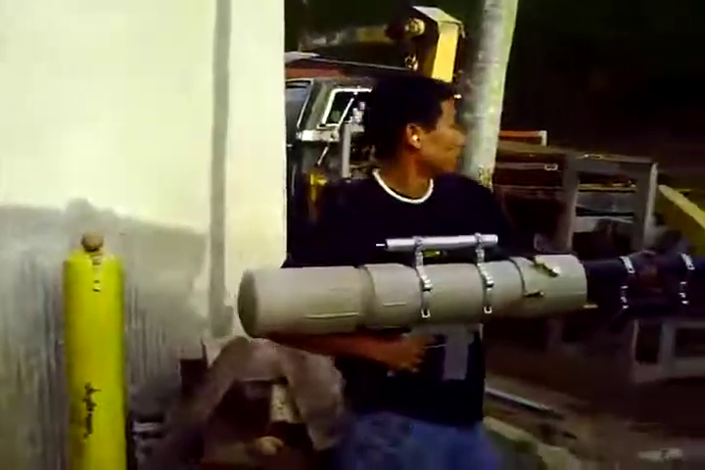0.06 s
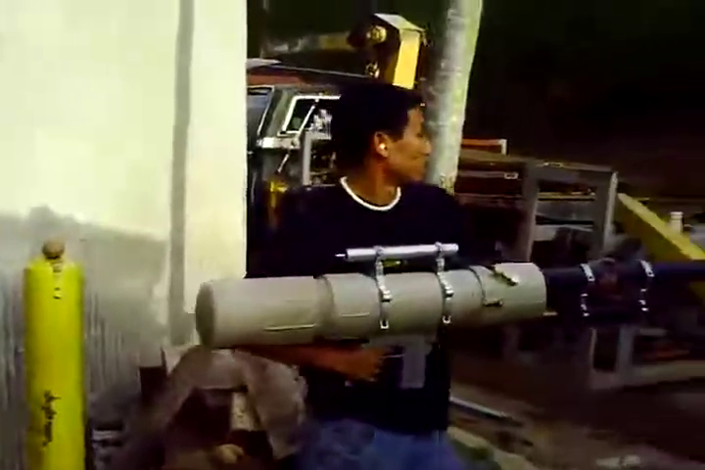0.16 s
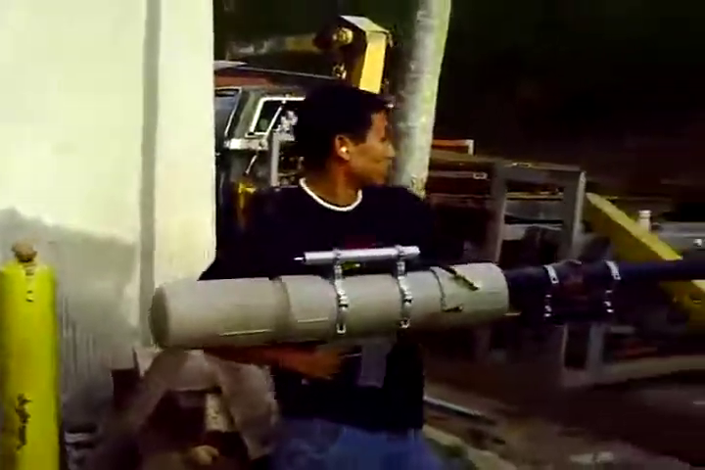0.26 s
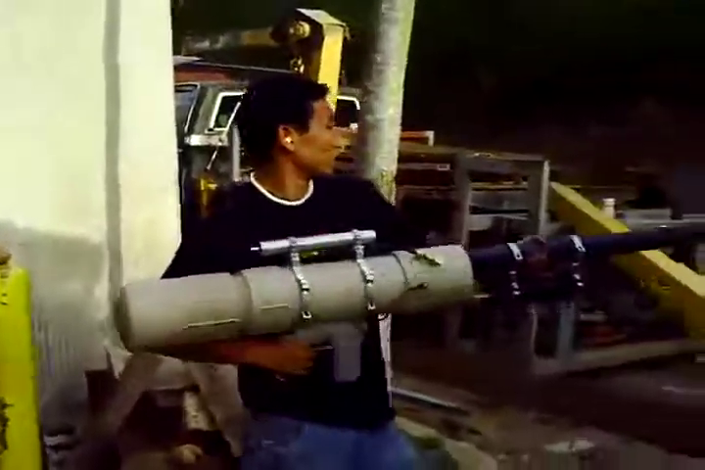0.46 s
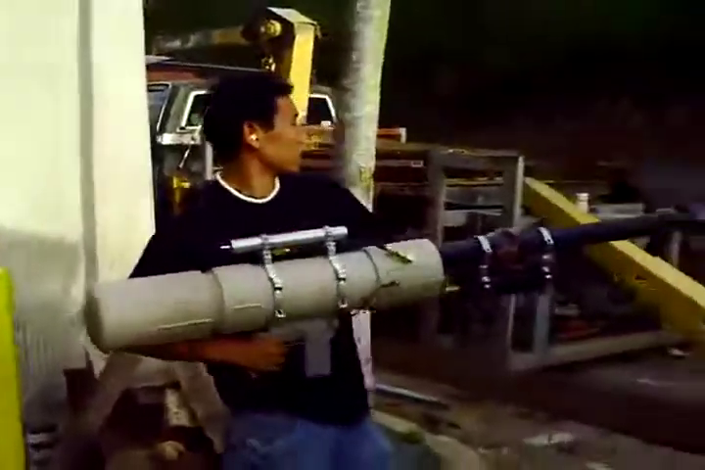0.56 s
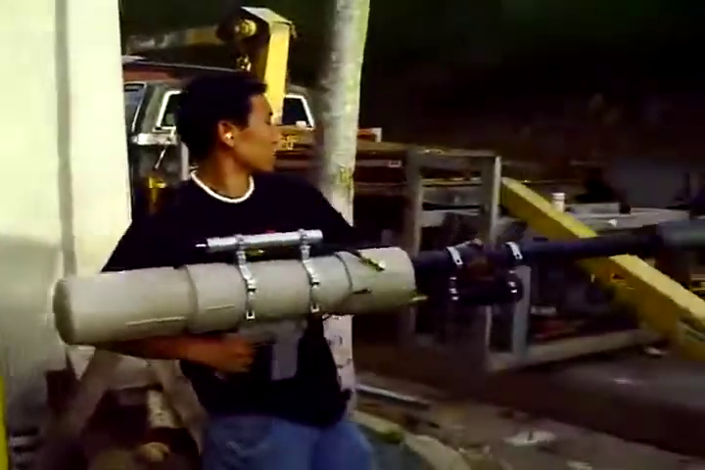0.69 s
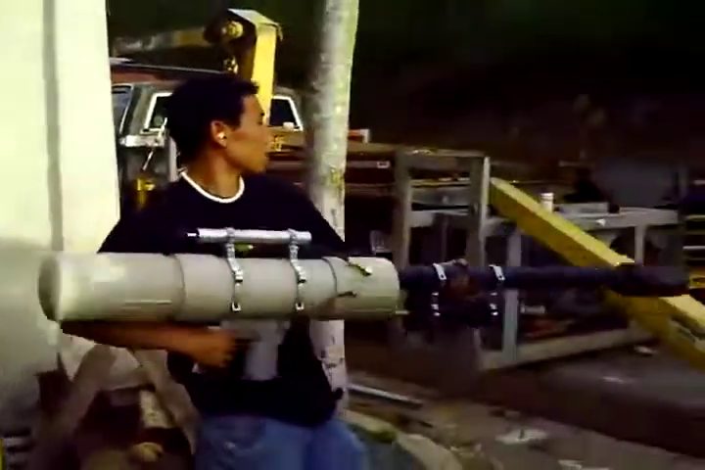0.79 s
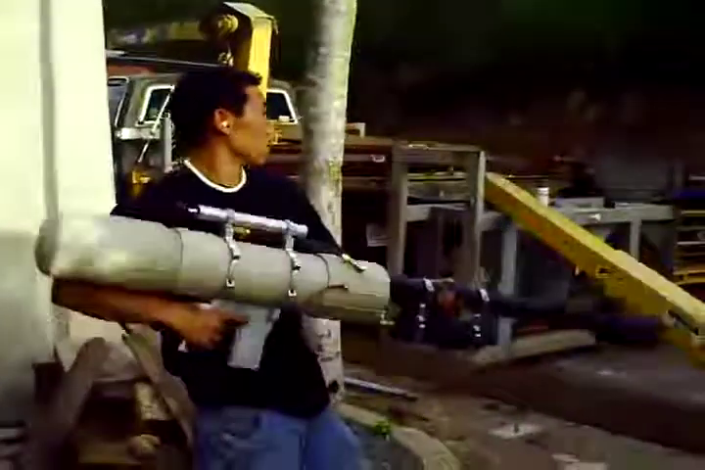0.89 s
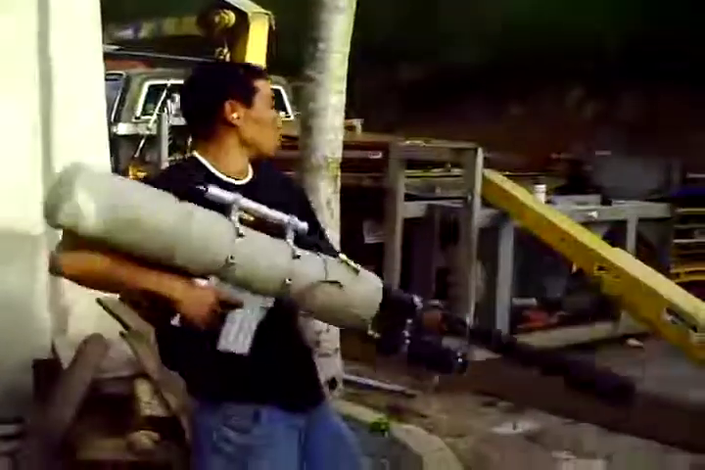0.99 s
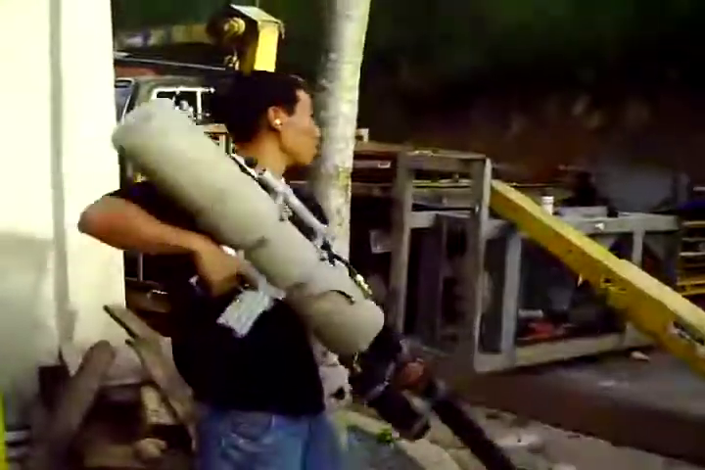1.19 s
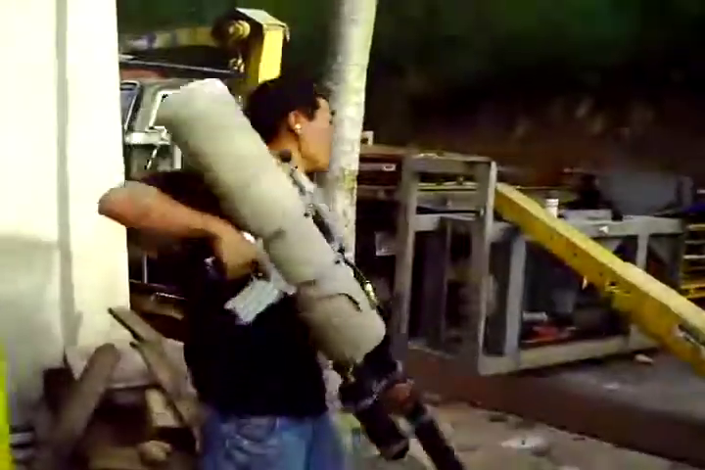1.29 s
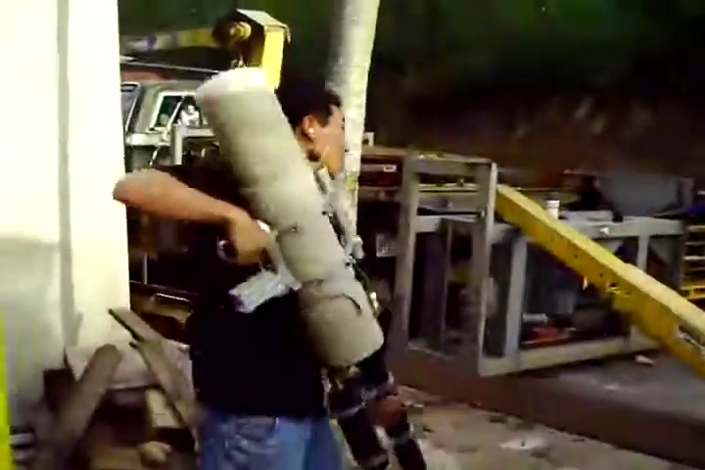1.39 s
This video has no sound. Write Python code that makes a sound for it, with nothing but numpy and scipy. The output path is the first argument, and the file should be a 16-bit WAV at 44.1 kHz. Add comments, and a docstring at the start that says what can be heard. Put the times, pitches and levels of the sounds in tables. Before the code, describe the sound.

A loud air cannon blast, distorted on the nearby microphone, is followed at once by a hollow pop and a gush of air. The boom fades outdoors, with three faint spurts of escaping air.

```python
"""A pneumatic potato launcher fires in a yard, close to a small camera whose input overloads.
A bird chirps once over outdoor air and a faint machine hum. The valve clicks and leaks for a moment,
then the tank dumps its air through the barrel and excites its resonances. A hollow pop and a last gush
follow and roll away, scattered by walls and trees. Finally leftover air hisses out in three spurts."""
import sys
import numpy as np
from scipy import signal
from scipy.fft import rfft, irfft, next_fast_len
from scipy.io import wavfile
from scipy.ndimage import map_coordinates

SR = 44100
rng = np.random.default_rng(int(sys.argv[2]) if len(sys.argv) > 2 else 0)


def dump(signal):
    """Clip the signal to [-1, 1] and save it as 16-bit WAV at the path in sys.argv[1]."""
    limited = np.clip(np.atleast_2d(signal).T, -1, 1)
    pcm = np.round(limited * 32767).astype(np.int16)
    wavfile.write(sys.argv[1], SR, pcm)


N = 63945

# Noise spectra. Each row: frequency in Hz, relative spectral density in dB.
BARREL_SPECTRUM = [(25, -4), (60, -15), (130, -10.5), (230, -4), (370, -5), (480, -7), (550, -2), (595, 5),
                   (650, -2), (720, -5), (850, -8), (980, -9), (1130, -1.5), (1260, 1), (1400, -5),
                   (1520, -7.5), (1780, -20.5), (2150, -11), (2420, -15), (2900, -13), (3400, -26),
                   (4400, -48), (7500, -92)]  # resonances of the barrel
THUMP_SPECTRUM = [(15, -17), (30, 2.5), (60, -7), (130, -8), (230, 1.5), (400, -8.5), (800, -33),
                  (2000, -81)]  # bass of the shot
POP_SPECTRUM = [(100, -23), (250, -19), (420, -4), (540, -16), (630, -3.5), (720, 2), (810, 4),
                (900, -11.5), (1020, -7), (1400, -10.5), (1800, -21), (3400, -27), (6000, -66)]  # hollow second bang
GUSH_SPECTRUM = [(60, -22.5), (100, -12), (150, -12), (230, -5.5), (340, -1), (480, -6), (650, -7),
                 (800, -5), (930, -5), (1130, -1), (1300, 1.5), (1450, -5.5), (1750, -17), (2100, -15),
                 (3000, -21), (4400, -40), (7000, -70)]  # outflow after the pop
JET_SPECTRUM = [(600, -36.5), (1500, 2), (2500, -2), (4000, -0.5), (7500, 0.5), (9500, -0.5), (11000, -19)]  # turbulent hiss
SEEP_SPECTRUM = [(25, -5), (100, -10), (250, -6.5), (340, -5), (400, -6), (470, -13), (560, 0.5), (680, -2),
                 (800, -7), (1020, -14.5), (1200, -5), (1400, -9.5), (1650, -21), (3200, -24.5),
                 (5000, -49), (8000, -80)]  # air seeping into the barrel
YARD_SPECTRUM = [(59, -36), (100, -8), (189, -8.5), (219, -13), (330, -6), (444, -7.5), (691, -0.5),
                 (875, -4), (1210, 0), (1670, -14.5), (2030, -12), (2850, -15), (3400, -25), (4420, -45),
                 (7480, -120)]  # boom of the reverberation
RUMBLE_SPECTRUM = [(15, 4), (35, 8.5), (60, 1), (100, -5), (170, -5), (260, -2), (400, -9), (800, -37),
                   (2000, -73)]  # bass of the reverberation
SPURT_SPECTRUM = [(1000, -24), (2500, -9.5), (4500, -9.5), (6500, -3), (8500, 2), (9700, -0.5),
                  (11000, -14)]  # thin hiss of leftover air
CLICK_SPECTRUM = [(500, -16), (1200, -9), (2200, 2), (2700, -1), (3300, 3), (4200, -2.5), (5500, -19),
                  (8800, -4), (11000, -26.5)]  # knocking plastic
AIR_SPECTRUM = [(20, 4), (60, -9.5), (150, -1.5), (300, -15.5), (550, -10.5), (850, -15.5), (1050, -12),
                (1590, -22.5), (2120, -15.5), (2500, -23), (3200, -22.5), (4500, -35), (10000, -30),
                (12000, -68)]  # outdoor background

# Surges of air after the pop. Each row: start in seconds, length in seconds, level in dB.
GUSH_SURGES = [(0.393, 0.035, -4.5), (0.433, 0.027, -11.5), (0.456, 0.028, -11)]
# Hiss behind the shot and the pop. Each row: start, rise and T60 in seconds, level in dB.
JET_BURSTS = [(0.235, 0.0086, 0.42, -1), (0.389, 0.012, 0.21, -4)]
# The opening valve. Each row: time in seconds, level in the barrel in dB, level of the hiss in dB.
VALVE_LEAK = [(0.159, -49.5, -63), (0.181, -45.5, -48.5), (.19, -39.5, -45), (.202, -21.5, -43),
              (0.215, -23, -37), (0.229, -15.5, -26)]
# Escapes of leftover air. Each row: start, rise, hold and release in seconds, level in dB.
AIR_SPURTS = [(0.765, 0.022, .13, .09, -45.5), (1.072, 0.016, .13, .08, -46), (1.34, 0.11, .06, .08, -46)]
# Knocks of the valve and trigger. Each row: start in seconds, level in dB.
CLICK_EVENTS = [(.169, -52), (.1855, -32), (1.041, -55), (1.076, -52.5)]
# Pitch contour of the bird. Each row: time in seconds, frequency in Hz.
CHIRP_PITCH = [(0.038, 4220), (0.053, 4220), (.059, 3880), (.067, 3900)]
# Partials of the machine hum. Each row: frequency in Hz, base level in dB.
HUM_PARTIALS = [(119.5, -50), (236, -58.5)]
# Slow wavering of the hum. Each row: time in seconds, gain in dB.
HUM_WAVER = [(0, 0), (.12, -9.5), (.8, -0.5), (1.45, -1.5)]
# Frequency response of the camera. Each row: frequency in Hz, gain in dB.
CAMERA_RESPONSE = [(20, -2), (8500, 1), (9600, -1.5), (10300, -4.5), (10900, -17.5), (11400, -58)]

SHOT_S, POP_S, ATTACK_S = 0.2317, 0.389, 0.0011
BAND_LIMIT_HZ = 11364


def amp(db):
    """Amplitude ratio of a level in decibels."""
    return 10 ** (np.asarray(db) / 20)


def since(start):
    """Seconds elapsed since start, zero before it."""
    return np.maximum(np.arange(N) / SR - start, 0)


def colour(x, spectrum):
    """Linear filtering: gains are interpolated over log frequency and vanish above the band limit."""
    size = next_fast_len(N + 8192)
    hz = np.fft.rfftfreq(size, 1 / SR)
    knot_hz, knot_db = np.transpose(spectrum)
    gain = amp(np.interp(np.log(hz + 1), np.log(knot_hz + 1), knot_db))
    return irfft(rfft(x, size) * gain * (hz < BAND_LIMIT_HZ), size)[:N]


def noise(spectrum):
    """Source and filter: white noise shaped by a spectrum and scaled to rms 1."""
    shaped = colour(rng.standard_normal(N), spectrum)
    return shaped / np.sqrt(np.mean(shaped ** 2) + 1e-20)


def wobble(rate):
    """Slow random modulation: a spline through rate random knots a second."""
    knots = rng.standard_normal(int(N * rate / SR) + 4)
    return map_coordinates(knots, [np.arange(N) * rate / SR])


def burst(start, rise, t60):
    """Exponential build-up under an exponential decay of 60 dB in t60 seconds."""
    t = since(start)
    return (1 - np.exp(-t / rise)) * amp(-60 * t / t60)


def shot():
    """Pipe resonance: the valve cracks open and the dumped air makes the barrel roar over a thump."""
    roar = amp(7) * burst(SHOT_S, ATTACK_S, t60=0.41) * noise(BARREL_SPECTRUM)
    thump = amp(-1.5) * burst(SHOT_S, ATTACK_S, t60=0.21) * noise(THUMP_SPECTRUM)
    crack = amp(3) * burst(SHOT_S, ATTACK_S, t60=0.022) * noise(JET_SPECTRUM)
    return roar + thump + crack


def muzzle_wave(push_s=0.0044):
    """Blast wave: a short compression leaves the muzzle, followed by a longer rarefaction."""
    age = since(SHOT_S) / push_s
    return amp(-5) * (age > 0) * (1 - age) * np.exp(-age)


def pop_and_gush(rise_s=0.0065, release_s=0.0089):
    """Damped resonance gives a hollow second bang; air gushes in surges that add in power, then stops."""
    bang = amp(6) * burst(POP_S, ATTACK_S, t60=0.11) * noise(POP_SPECTRUM)
    surges = []
    for start, length, db in GUSH_SURGES:
        onset = 1 - np.exp(-since(start) / rise_s)
        surges.append(amp(db) * onset * np.exp(-since(start + length) / release_s))
    return bang + np.linalg.norm(surges, axis=0) * noise(GUSH_SPECTRUM)


def jets(flutter_db=0.84):
    """Turbulence radiates broadband noise: a fluttering hiss builds up behind each bang."""
    return sum(amp(db + flutter_db * wobble(250)) * burst(start, rise, t60) * noise(JET_SPECTRUM)
               for start, rise, t60, db in JET_BURSTS)


def yard_reverberation(start=0.39, rise=0.028, late_t60=2):
    """Scattering by walls and trees: a quick and a slow decay add in power, with an uneven level."""
    unevenness = amp(0.89 * wobble(69.5))

    def band(spectrum, early_db, early_t60, late_db):
        early = amp(early_db) * burst(start, rise, early_t60)
        late = amp(late_db) * burst(start, rise, late_t60)
        return np.hypot(early, late) * unevenness * noise(spectrum)

    boom = band(YARD_SPECTRUM, early_db=-10.5, early_t60=0.6775, late_db=-32.5)
    bass = band(RUMBLE_SPECTRUM, early_db=-21, early_t60=0.8, late_db=-38.5)
    treble = band(JET_SPECTRUM, early_db=-23.5, early_t60=0.74, late_db=-44)
    return boom + bass + treble


def valve_leak():
    """Flow through a constriction: air hisses past the opening valve into the barrel until the shot."""
    t = since(0)
    times, barrel_db, hiss_db = np.transpose(VALVE_LEAK)
    seep = amp(np.interp(t, times, barrel_db)) * noise(SEEP_SPECTRUM)
    hiss = amp(np.interp(t, times, hiss_db)) * noise(JET_SPECTRUM)
    return (seep + hiss) * (t > times[0]) * (t < SHOT_S)


def spurts():
    """Jet noise: leftover air escapes in thin hisses that rise, hold and die away."""
    envelope = sum(amp(db) * np.minimum(since(start) / rise, 1)
                   * np.exp(-since(start + rise + hold) / release)
                   for start, rise, hold, release, db in AIR_SPURTS)
    return envelope * noise(SPURT_SPECTRUM)


def clicks():
    """Impact excitation: small plastic parts knock as the launcher is fired and lowered."""
    envelope = sum(amp(db) * burst(start, ATTACK_S, t60=0.06) for start, db in CLICK_EVENTS)
    return envelope * noise(CLICK_SPECTRUM)


def bird(echo_t60=0.5):
    """A faint tone glides down; convolution with the yard's impulse response adds its echo."""
    t = since(0)
    times, hz = np.transpose(CHIRP_PITCH)
    progress = np.clip((t - times[0]) / (times[-1] - times[0]), 0, 1)
    phase = 2 * np.pi * np.cumsum(np.interp(t, times, hz)) / SR
    chirp = amp(-59.5) * np.sin(np.pi * progress) * np.sin(phase)
    yard = rng.standard_normal(N) * amp(-60 * t / echo_t60)
    return chirp + signal.fftconvolve(chirp, yard / np.linalg.norm(yard))[:N]


def background():
    """Ambient noise: outdoor air and a machine hum, slightly modulated in amplitude and phase."""
    t = since(0)
    waver_db = np.interp(t, *np.transpose(HUM_WAVER))
    hum = np.zeros(N)
    for hz, db in HUM_PARTIALS:
        rms = amp(db + waver_db + wobble(17))
        hum += rms * np.sqrt(2) * np.sin(2 * np.pi * hz * t + 0.5 * wobble(14))
    return amp(-49.5) * noise(AIR_SPECTRUM) + hum


def scene():
    """Superposition: the pressures of all sources add at the microphone."""
    firing = valve_leak() + shot() + muzzle_wave() + pop_and_gush() + jets()
    return (firing + yard_reverberation() + spurts() + clicks() + bird() + background())[None]


def record(dry):
    """Saturation: the camera's input squares off the bangs; its low-pass then cuts the top octave."""
    clip_level, hardness = 0.68, 5.5
    pressure = dry[0]
    clipped = pressure / (1 + np.abs(pressure / clip_level) ** hardness) ** (1 / hardness)
    return colour(clipped, CAMERA_RESPONSE)[None]


dry = scene()
out = record(dry)
dump(out)
```